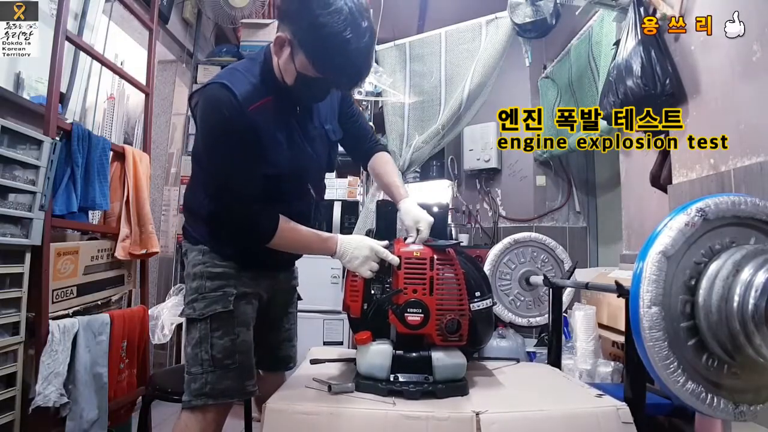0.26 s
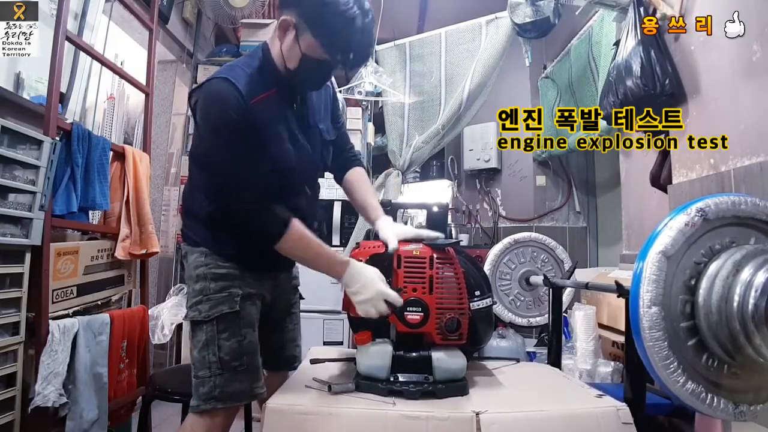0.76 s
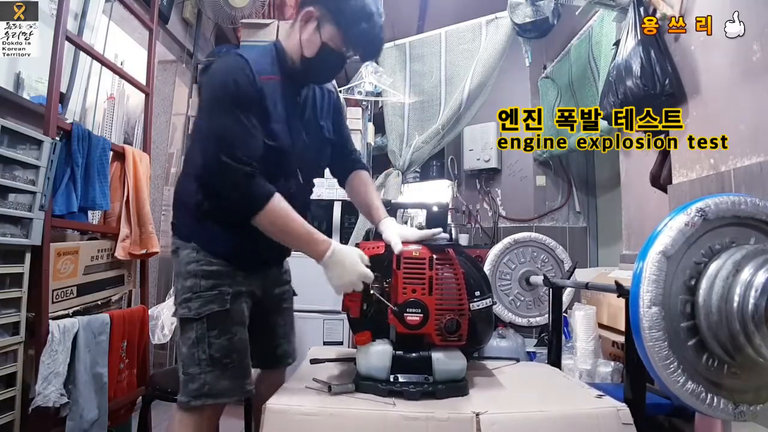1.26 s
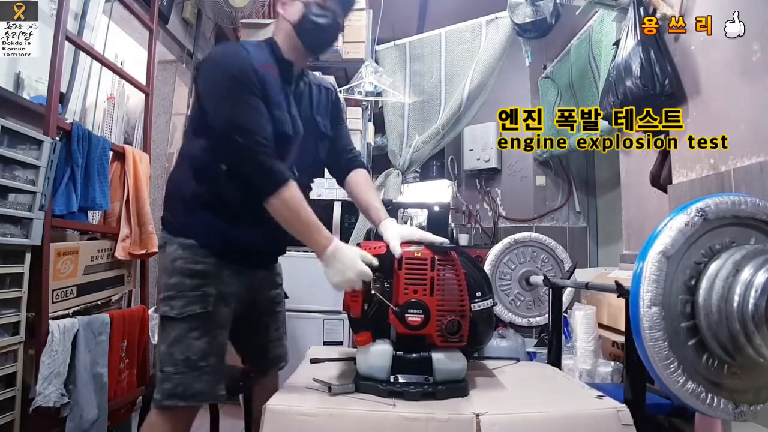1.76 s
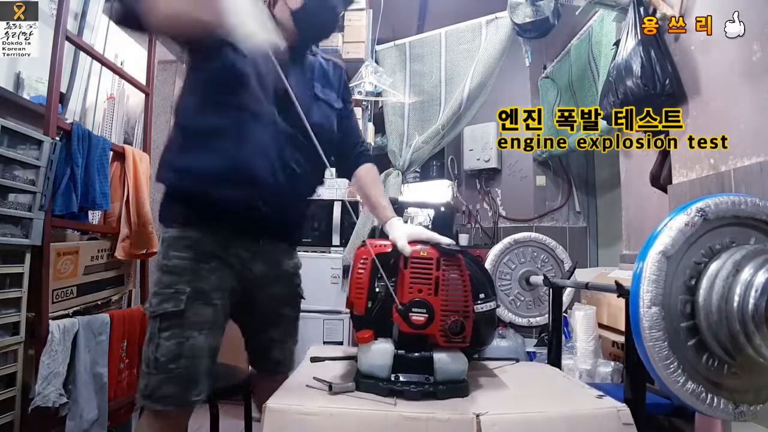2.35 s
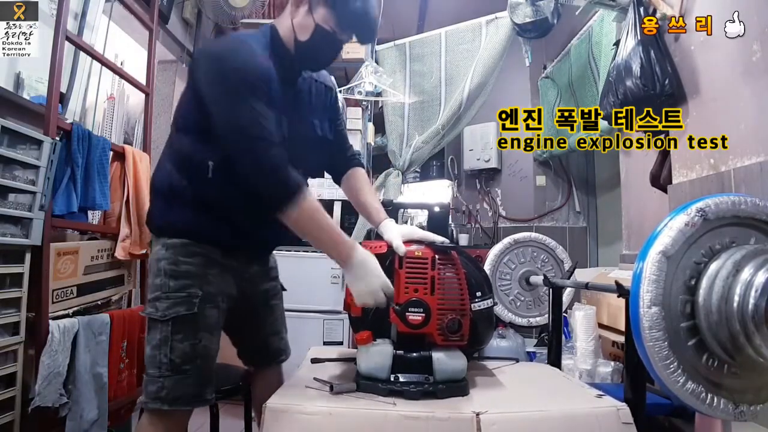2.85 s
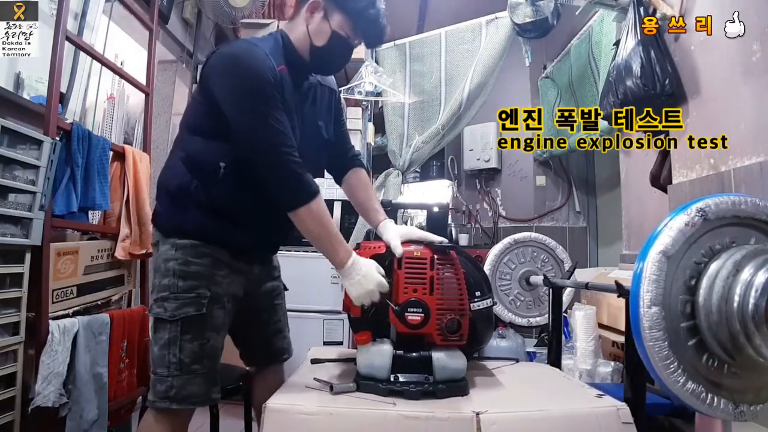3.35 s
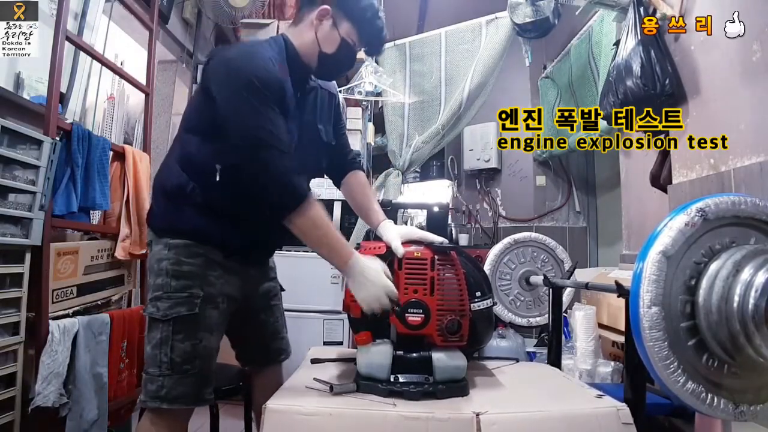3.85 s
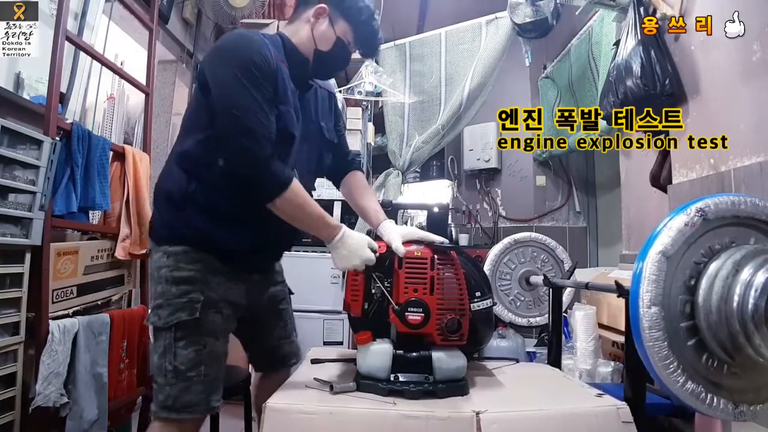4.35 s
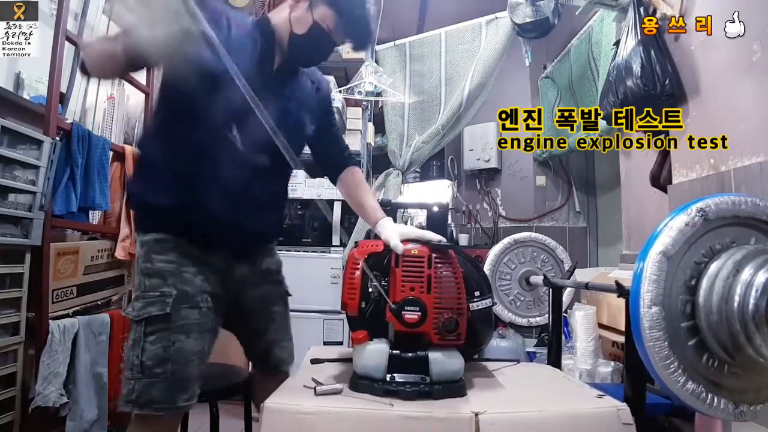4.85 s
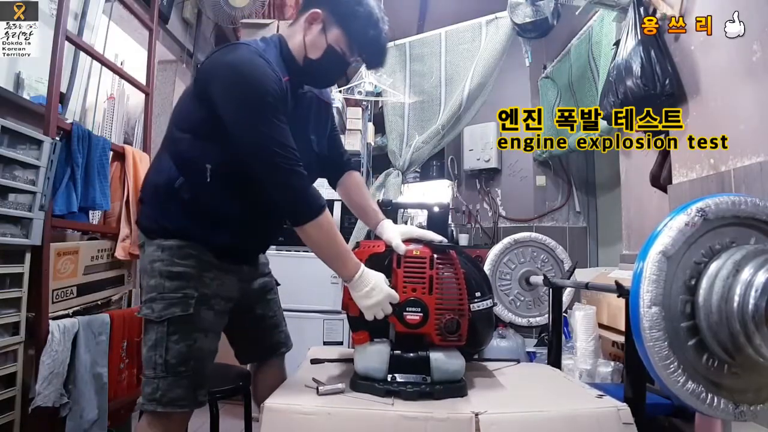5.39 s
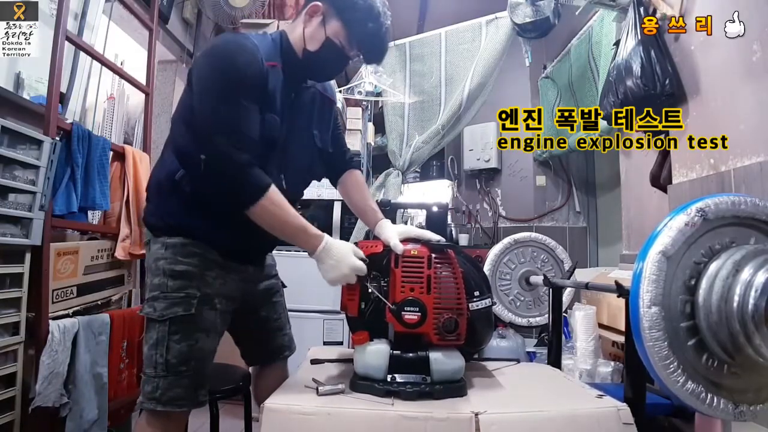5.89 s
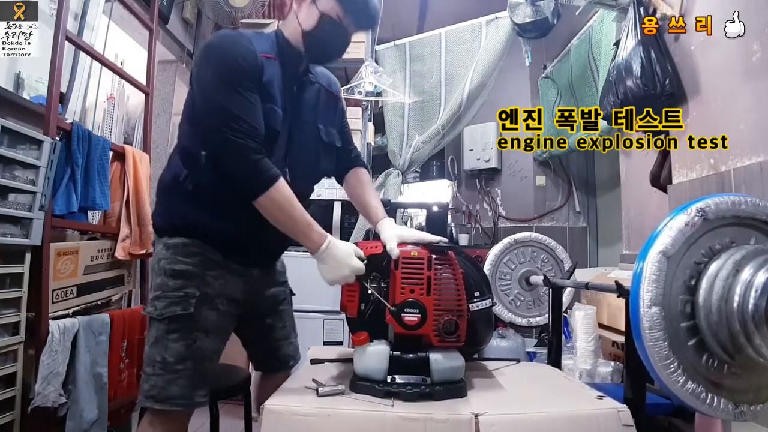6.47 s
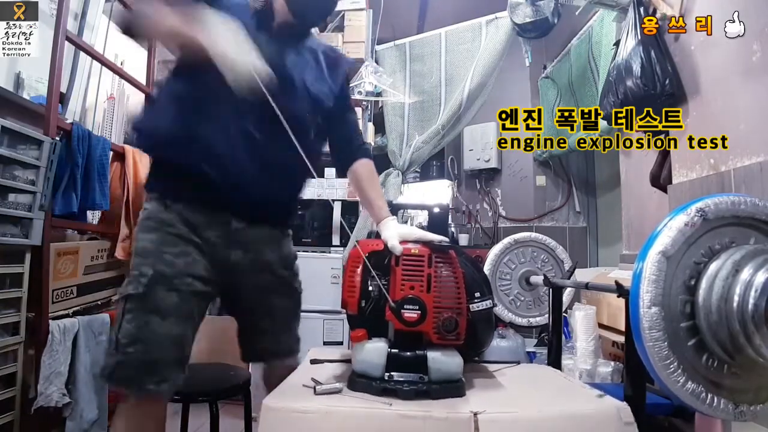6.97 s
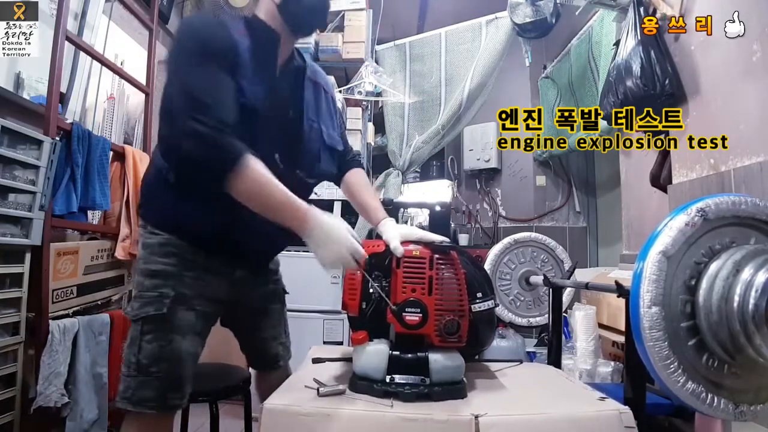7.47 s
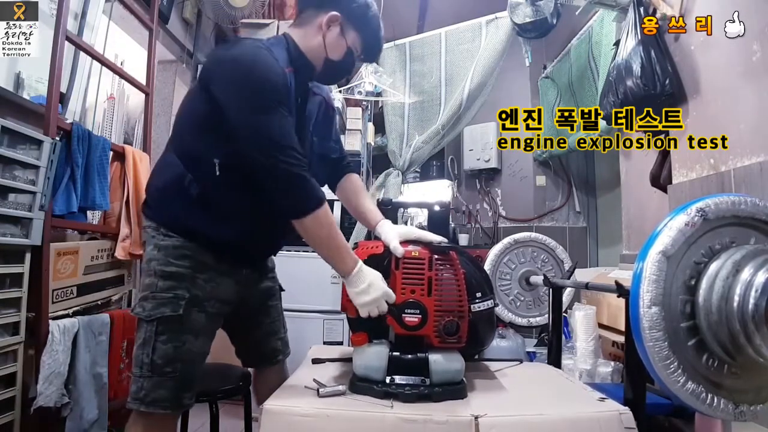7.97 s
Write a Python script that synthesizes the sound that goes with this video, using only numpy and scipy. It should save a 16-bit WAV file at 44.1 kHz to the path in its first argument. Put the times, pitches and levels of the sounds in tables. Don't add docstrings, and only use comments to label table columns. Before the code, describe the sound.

In a cluttered workshop, a starter rope cranks a small blower engine in three short rattling bursts, handle and levers clacking, never firing.

```python
import sys
import numpy as np
from scipy import signal
from scipy.fft import rfft, irfft
from scipy.io import wavfile
from scipy.ndimage import uniform_filter1d

SR = 44100
rng = np.random.default_rng(int(sys.argv[2]) if len(sys.argv) > 2 else 0)


def ratio(d):
    e = np.asarray(d, float) / 20
    return 10 ** e


def master_out(mix):
    frames = np.transpose(np.atleast_2d(mix))
    ceiling = np.clip(frames, -1, 1)
    pcm = np.round(ceiling * 32767).astype(np.int16)
    wavfile.write(sys.argv[1], SR, pcm)


N = 362943

# first exhaust opening in [s], top speed in [turns/s],
# time to reach it in [s], crank turns in [count].
PULLS = [
    (2.1929, 23.695, .1542, 11),
    (4.4889, 25.679, .1543, 12),
    (6.8344, 26.384, .1664, 12),
]
# puffs in [dB], whir in [dB], extra while the rope is taut in [dB],
# how fast it fades with speed [exponent].
PULL_STRENGTH = [(0, -25, 4, 1.6), (-3, -27.5, 0, 0.88), (0.5, -24.5, 6, 1.054)]
# frequency in [Hz], width in [Hz], level in [dB].
MUFFLER_MODES = [(238, 40, -19), (316, 58, -7.5), (430, 85, -8), (540, 110, -14), (650, 100, -26),
                 (975, 60, -31), (80, 36, -19.5)]
# frequency in [Hz], width in [Hz], level in [dB].
HOUSING_MODES = [(1910, 19, 9.5), (2300, 110, 16.5), (2700, 33, 17), (3530, 250, -28), (3550, 780, 26),
                 (4800, 160, 3)]
# frequency in [Hz], density in [dB per Hz].
HISS_SPECTRUM = [(3000, -30), (4300, -6), (5200, -2), (6600, 0), (8000, -6), (10000, -5), (12500, -17),
                 (15000, -13), (16200, -22)]
# time in [s], level in [dB], brightness in [dB].
HANDLING = [(0, -48.5, 2), (.5, -67, -5.5), (1.0, -61.5, 4.5), (1.34, -50.5, -5), (1.5, -50.5, 4),
            (1.78, -55.5, -2), (2.12, -46, -1), (2.9, -57.5, -19), (3.35, -61.5, -3), (3.98, -55.5, -5),
            (4.19, -59, -23.5), (4.44, -64.5, 13.5), (5.2, -46, -27), (5.45, -55, -10), (6.6, -50.5, 6),
            (6.77, -65, 3), (7.6, -54.5, -18), (8.23, -66, 1)]
# start in [s], length in [s], level in [dB].
SCRAPES = [
    (1.51, 0.1, -53.5),
    (1.977, 0.49, -47.5),
    (2.956, 0.18, -57),
    (3.25, 0.079, -60),
    (4.356, 0.086, -48),
    (5.574, 0.11, -65.5),
    (6.242, 0.041, -57),
    (6.707, 0.12, -42.5),
    (7.462, 0.026, -54),
]

# time in [s], peak in [dB], shell resonance in [Hz] and, in some, extra brightness in [dB].
BLOWS = [
    (1.3735, -6, 1180, -3),
    (1.3871, -6, 2300, 1.5),
    (1.674, -11, 3600, 2),
    (2.8711, -4.5, 2290, -1.5),
    (3.8546, -5.5, 2660, 1),
    (5.2131, -4, 2500, 3),
    (7.6326, -3, 2300, -4),
    (.0924, -19.5, 3240, -5),
]
# start in [s], peak in [dB], shell in [Hz].
PAWLS = [(2.1818, -12, 1870), (2.2573, -10.5, 2290), (2.346, -15, 2300), (2.4316, -6, 3510),
         (2.6576, -22, 3230), (2.7495, -26, 2300), (2.839, -21, 1590), (4.4851, -20, 1940),
         (4.5468, -18, 3500), (4.589, -13.5, 3560), (4.6974, -14, 1880), (4.71, -15.5, 2300),
         (4.902, -19.5, 2300), (4.9672, -16.5, 3530), (5.0528, -18.5, 2300), (6.8298, -11, 3340),
         (6.8958, -4, 2650), (6.9382, -22, 3500), (1.291, -25, 3400), (3.614, -31.5, 2300),
         (3.7277, -29, 3870), (4.024, -26.5, 1930), (4.4695, -34, 1200), (5.995, -26, 1880),
         (7.6151, -19, 3000)]
# start in [s], peak in [dB], shell in [Hz], extra brightness in [dB].
HANDLE = [(1.0576, -21.5, 3600, 6), (2.0099, -34, 2300, -17), (2.9581, -28.5, 1460, 1.5),
          (4.361, -41, 2040, -7), (5.1412, -24, 1370, 2), (5.387, -22.5, 1480, -8),
          (5.655, -36.5, 1840, -4), (5.7706, -19.5, 1920, 0), (6.075, -8.5, 1170, -6.5),
          (6.3623, -18, 3910, 3), (6.7168, -35, 1900, -4.5), (6.7365, -32, 1250, 1.5),
          (7.3607, -19.5, 2430, -3), (7.4645, -19, 1620, -7), (7.5811, -24.5, 3190, -3.5),
          (8.1336, -38.5, 3930, -8.5), (0.7713, -45, 1150, -4), (3.4397, -44.5, 1240, -2),
          (.4476, -56.5, 1250, 13), (4.0534, -17.5, 2300, 1.5)]
# start in [s], peak in [dB], shell in [Hz].
TAPS = [(.978, -27.5, 3660), (1.5476, -26.5, 4100), (1.5879, -23, 1960), (3.1015, -25.5, 1570),
        (3.679, -43, 1700), (5.3354, -23, 1770), (5.444, -31.5, 2300), (5.7039, -28.5, 2393),
        (6.245, -29.5, 3420), (6.4291, -33.5, 2400), (7.7124, -28, 1650), (8.186, -37, 2000)]
# start in [s], peak in [dB], shell in [Hz].
BUMPS = [(0.8708, -36, 1210), (1.9773, -38, 1910), (2.1311, -30, 1600), (2.736, -31, 3210),
         (3.0473, -31, 1600), (3.265, -37.5, 1850), (3.3159, -34.5, 1960), (4.1865, -40.5, 1810),
         (5.575, -26.5, 1270), (5.862, -41.5, 1940), (5.936, -39.5, 1636), (7.8934, -32.5, 1270)]
# start in [s], peak in [dB], shell in [Hz].
SNAPS = [(1.504, -20, 1270), (2.9917, -22, 2640), (3.1706, -36.5, 3600), (3.283, -41, 3320),
         (3.9958, -28, 3380), (5.1686, -16, 3570), (5.287, -16.5, 1760), (5.6134, -34, 1900),
         (5.679, -36, 1370), (7.296, -14, 3400), (7.4944, -23.5, 2300), (7.769, -32, 3300),
         (7.994, -44, 3200)]
# start in [s], peak in [dB], shell in [Hz].
SWITCH = [
    (.077, -11.5, 3260),
]
# thud in [dB re peak], tick in [dB re peak].
VOICES = [
    (-13, -6),
    (-12.5, -8),
    (-2.5, -5.5),
    (-2, -12),
    (4.5, -17),
    (-47, -15),
    (-18, 11.5),
]
# frequency in [Hz], level in [dB], decay time T60 in [s].
CASING_MODES = [(524, -8, 0.091), (915, -25, .1), (2300, -15, 0.088), (2290, -16, 0.077)]
# frequency in [Hz], decay time T60 in [s], level in [dB],
# part [0 guard, 1 bracket, 2 spring clip].
THIN_METAL = [(1249, 0.96, 0, 0), (1385, 1.22, -2, 1), (1655, 0.62, -2, 0), (1925, 0.62, 0, 1),
              (3165, 0.61, 0, 2)]
# time in [s], guard in [dB], bracket in [dB], clip in [dB].
METAL_HITS = [
    (.08, -56, -57, -43),
    (1.378, -44, -35, -52),
    (2.873, -42, -42, -48),
    (3.861, -42, -54, -52),
    (4.057, -49, -56, -50),
    (5.215, -36, -43, -50),
    (6.081, -39, -37, -54),
    (7.636, -36.5, -45, -45),
]

# frequency in [Hz], T60 in [s].
ROOM_T60 = [(150, 0.49), (600, 0.2), (2000, 0.21), (6000, 0.16), (14000, 0.1)]
# peak in [s], level in [dB], swells for [s], dies in [s].
GUSTS = [(.11, -40.5, 0.39, 0.053), (0.919, -30, 0.13, 0.22), (1.35, -33, 0.15, .19),
         (1.74, -42, 0.1, 0.073), (2.07, -42, 0.47, 0.16), (2.85, -56.5, 2.9, 0.4), (3.72, -73, 0.27, 0.2),
         (3.86, -72, .1, 0.27), (4.064, -64, .11, .07), (5.23, -47, 1.2, .05), (5.33, -38, .05, 0.33),
         (5.494, -37, 0.055, 0.15), (6.646, -28, .11, .12), (7.41, -37.5, 1.9, 0.041),
         (7.614, -38.5, 0.59, 0.33), (8.1, -62, .8, 0.61)]
# frequency in [Hz], density in [dB per Hz].
SHOP_SPECTRUM = [(15, -39), (25, -23), (52, -1), (76, -5.5), (123, 3.5), (153, -69), (242, -14.5),
                 (427, -11.5), (818, -13), (3520, -46.5), (6210, -23), (7510, -34.5), (16000, -40.5)]
# frequency in [Hz], level in [dB rms].
HUM = [(118.4, -74), (242, -79.5)]
# time in [s], level in [dB].
DRONE = [(0, 1), (3.1, 3.5), (3.4, -18), (3.95, -17), (4.1, 1), (5.6, 1.5), (5.75, -12), (6.48, -16),
         (6.6, 5), (7.7, 0), (8.23, -14)]


def rms_one(x):
    return x / np.sqrt(np.mean(x ** 2) + 1e-20)


def peak_one(x):
    return x / np.max(np.abs(x))


def in_time(rows):
    s, *columns = np.transpose(rows)
    return [np.interp(np.arange(N) / SR, s, c) for c in columns]


def at_hz(points, hz):
    table_hz, values = np.transpose(points)
    return np.interp(np.log(hz), np.log(table_hz), values)


def band(x, low_hz, high_hz, order=2):
    edges_hz = [low_hz, min(high_hz, .45 * SR)]
    return signal.sosfilt(signal.butter(order, edges_hz, "band", fs=SR, output="sos"), x)


def coloured(x, spectrum):
    hz = np.maximum(np.arange(N // 2 + 1) * SR / N, 1)
    return rms_one(irfft(rfft(x) * ratio(at_hz(spectrum, hz)), N))


def drift(rate):
    r = np.exp(-80 * np.pi * rate / SR)
    slow = signal.lfilter([1], [1, -2 * r, r * r], rng.standard_normal(N // 40 + 2002))[2000:]
    return np.interp(np.arange(N) / 40, np.arange(len(slow)), rms_one(slow))


def ring(x, hz, width_hz):
    r = np.exp(-np.pi * width_hz / SR)
    w = 2 * np.pi * hz / SR
    return signal.lfilter([0, np.sin(w)], [1, -2 * r * np.cos(w), r * r], x + 1e-18)


def ring_t60(x, hz, t60_s):
    return ring(x, hz, np.log(1000) / np.pi / t60_s)


def grit(shape, spread_db):
    return ratio(spread_db * np.minimum(rng.exponential(1, shape), 5)) * rng.choice([-1, 1], shape)


def spread(shape, spread_db, own):
    shared, left, right = grit((3, *shape), spread_db)
    return np.array([shared + own * left, shared + own * right])


def crank(pull):
    spin_up_s, coast_s, coast_power = .2617, .3516, 1.7956
    since = np.arange(N) / SR - pull[0]
    past = since - pull[2]
    pulled = 1 - (past / spin_up_s) ** 2
    coasting = 1 / (1 + (np.maximum(past, 0) / coast_s) ** coast_power)
    return np.maximum(np.where(past < 0, pulled, coasting), .2), since


def puffs():
    slack_s = 0.035
    bite_db_per_s, stall_db_per_s = 441, 50
    puff_power, whir_power = 1.1, 1.615
    intake_lag_s = 0.00343
    first_puff_db, last_intake_db = -2, -9
    intake_db, coasting_intake_db = -0.5, -3
    scatter_db, colour_spread_db = 2, 1.5
    push, angle, level = np.zeros((len(MUFFLER_MODES), N)), np.zeros(N), np.zeros(N)
    t = np.arange(N) / SR
    for pull, (puff_db, whir_db, taut_db, fade) in zip(PULLS, PULL_STRENGTH):
        share, since = crank(pull)
        turns = np.cumsum(share * (since >= 0)) * pull[1] / SR
        edges = np.interp(np.arange(pull[3] + 1), turns[since >= 0], t[since >= 0])
        taut = np.clip((pull[2] + 2 * slack_s - since) / slack_s, 0, 1)

        exhaust_s = edges[:-1]
        intake_s = exhaust_s + np.diff(edges) / 2 + intake_lag_s
        turn_s = np.gradient(edges)[:-1]
        at = (exhaust_s * SR).astype(int)
        exhaust_db = puff_db + taut_db * taut[at] + 20 * fade * puff_power * np.log10(share[at])
        inhale_db = exhaust_db + intake_db + coasting_intake_db * (1 - taut[at])
        inhale_db[-1] += last_intake_db
        exhaust_db[0] += first_puff_db
        levels_db = np.r_[exhaust_db, inhale_db] + scatter_db * rng.standard_normal(2 * len(exhaust_s))
        for at_s, level_db, period in zip(np.r_[exhaust_s, intake_s], levels_db, np.r_[turn_s, turn_s]):
            opening = np.hanning(int(.036 * period * SR))
            at = int((at_s - .0005) * SR) - len(opening) // 2
            colour_db = colour_spread_db * rng.standard_normal((len(MUFFLER_MODES), 1))
            push[:, at:at + len(opening)] += ratio(level_db + colour_db) * opening / opening.sum()

        angle += np.minimum(turns, pull[3])
        ends_db = bite_db_per_s * np.minimum(since, 0) - stall_db_per_s * np.maximum(t - edges[-1], 0)
        level += ratio(whir_db + taut_db * taut + ends_db) * share ** (fade * whir_power)
    gas = uniform_filter1d(push, size=700, origin=349) * rng.standard_normal(N) * ratio(22.5)
    body = sum(ratio(level_db) * ring(drive, hz, wide_hz)
               for drive, (hz, wide_hz, level_db) in zip(push + gas, MUFFLER_MODES))
    return ratio(-0.5) * band(body, 220, 3000, order=1), angle, level


def scrapes():
    fade_db_per_s = 496
    t = np.arange(N) / SR
    level = sum((t > s) * ratio(top_db - fade_db_per_s * np.maximum(t - s - long_s, 0))
                for s, long_s, top_db in SCRAPES)
    return level * ratio(3.4 * drift(40))


def whir(angle, level):
    pull_hiss_db, scrape_hiss_db = 1, -7.5
    rub_db, bright_db = in_time(HANDLING)
    turning = angle % 1 > 0
    bunch = ratio(2.3 * np.cos(2 * np.pi * (angle - .25)) * turning + 2.2 * drift(70))
    grains = spread((N,), spread_db=4.0, own=.8) * bunch
    ticks = rng.random((len(HOUSING_MODES), N)) < 300 / SR
    shell = sum(ratio(level_db) * np.sqrt(wide_hz) * ring(grains * tick, hz, wide_hz)
                for tick, (hz, wide_hz, level_db) in zip(ticks, HOUSING_MODES))
    rattling = ratio(np.where(turning, 0.5, -10))
    body = rms_one(band(shell, 1300, 4500)) * rattling + rms_one(band(grains, 1380, 3890))
    hiss = coloured(grains, HISS_SPECTRUM)
    rumble = rms_one(band(grit(N, spread_db=0.5) * bunch, 217, 1266)) * ratio(np.where(turning, -4.0, 3.0))
    scrape = scrapes()
    body_level = level + scrape + ratio(rub_db)
    hiss_level = level * ratio(pull_hiss_db) + scrape * ratio(scrape_hiss_db) + ratio(rub_db + bright_db)
    return body_level * (body + rumble) + hiss_level * hiss


def clacks():
    size = 4000
    kinds = [BLOWS, PAWLS, HANDLE, TAPS, BUMPS, SNAPS, SWITCH]
    rows = [(*row[:3], thud_db, tick_db + sum(row[3:]))
            for kind, (thud_db, tick_db) in zip(kinds, VOICES) for row in kind]
    t = np.arange(size) / SR
    out, knocks = np.zeros((2, N + size)), np.zeros((len(CASING_MODES), N + size))
    contacts = spread((len(rows), size), spread_db=3.5, own=.8)
    strengths_db = rng.normal(0, 3, (len(rows), len(CASING_MODES)))
    for k, (s, level_db, shell_hz, thud_db, tick_db) in enumerate(rows):
        hard = np.clip((level_db + 21.0) / 12, 0, 1)
        lead = 0.0022 + .0055 * hard
        shape = np.where(t < lead, (t / lead) ** 0.81, np.exp(-(t - lead) / 0.0093))
        crack = 1.7 * hard * np.exp(-((t - lead) / 0.0002) ** 2)
        rattle = contacts[:, k] * (shape + crack)

        direct = peak_one(band(rattle, 1240, 4110, order=4))
        resonance = peak_one(band(ring(rattle, shell_hz, 300), 600, 11000, order=3))
        shell = peak_one(direct + 0.67 * resonance)
        high = band(rattle, 8000, 8700) + band(rattle, 13800, 16500) * .8
        tick = ratio(tick_db + 2.5) * peak_one(band(rattle, 4070, 9000) + ratio(-25.0 + 9.0 * hard) * high)
        thud = ratio(thud_db - 5.5) * peak_one(band(rattle.sum(axis=0), 348, 1113, order=3))

        at = int((s + .002 - lead) * SR)
        out[:, at:at + size] += ratio(level_db + 5.5) * (shell + tick + thud)
        knock = rattle[0] / np.sqrt(np.sum(rattle[0] ** 2))
        knocks[:, at:at + size] += ratio(level_db + strengths_db[k])[:, None] * knock
    casing = sum(ratio(level_db - 14) * ring_t60(hit, hz, t60)
                 for hit, (hz, level_db, t60) in zip(knocks, CASING_MODES))
    return (out + band(casing, 290, 12000))[:, :N]


def thin_metal():
    blows = np.zeros((3, N))
    for s, *levels_db in METAL_HITS:
        blows[:, int(s * SR)] = ratio(np.array(levels_db))
    rings = sum(ratio(level_db + 4.54 * drift(30)) * ring_t60(blows[int(round(part))], hz, t60)
                for hz, t60, level_db, part in THIN_METAL)
    return band(rings, 830, 4000)


def workshop(x):
    t = np.arange(int(.5 * SR)) / SR
    mid, side = rng.standard_normal((2, len(t)))
    pair = np.array([mid + band(side, 600, 19000), mid - band(side, 600, 19000)])
    answer = sum(band(pair, hz / np.sqrt(2), hz * np.sqrt(2)) * ratio(-60 * t / at_hz(ROOM_T60, hz))
                 for hz in 60 * 2. ** np.arange(9))
    answer *= np.minimum(t / 0.0048, 1) / np.sqrt(np.sum(answer ** 2) / 2)
    return signal.fftconvolve(x, answer, axes=1)[:, :N]


def gusts():
    fade_db, calm_db = 37.5, -80
    lumps = band(rng.standard_normal(N) * ratio(4.2 * drift(26)), 69.5, 185, order=3)
    swell = band(rng.standard_normal(N), 25, 79)
    t = np.arange(N) / SR
    level = ratio(calm_db) + sum(ratio(top_db - fade_db * np.maximum((s - t) / swell_s, (t - s) / die_s))
                               for s, top_db, swell_s, die_s in GUSTS)
    return level * (rms_one(lumps) + 0.28 * rms_one(swell)) * ratio([[6], [-20]])


def background():
    shop_db = -56
    mid, side = rng.standard_normal((2, N))
    side = band(side, 430, 19000)
    air = ratio(shop_db + 0.87 * drift(3.1)) * coloured(np.array([mid + side, mid - side]), SHOP_SPECTRUM)
    t = np.arange(N) / SR
    hum = sum(np.sqrt(2) * ratio(level_db + 2.0 * drift(3.5)) * np.sin(2 * np.pi * hz * t) for hz, level_db in HUM)
    return band(air, 184, 19000) + ratio(in_time(DRONE)[0]) * (band(air, 36, 200) + hum)


def scene():
    low, angle, level = puffs()
    bright = whir(angle, level) + clacks() + thin_metal()
    left, right = low + bright
    left = np.concatenate([np.zeros(2), left[:-2]])
    left, right = np.array([left, right]) + workshop(ratio(-3.0) * bright + low / 10 ** .5)
    left = left - .28 * band(left, 1000, 6000, order=1) - .55 * band(left, 7000, 11500, order=1)
    return np.array([left, right]) + gusts() + background()


def top_cut(x):
    return signal.sosfilt(signal.butter(12, 15950, fs=SR, output="sos"), x)


def record(dry):
    rounded = np.tanh(dry)
    cut = signal.sosfilt(signal.cheby2(12, 60, 16700, fs=SR, output="sos"), rounded)
    return top_cut(cut)


dry = scene()
out = record(dry)
master_out(out)
```